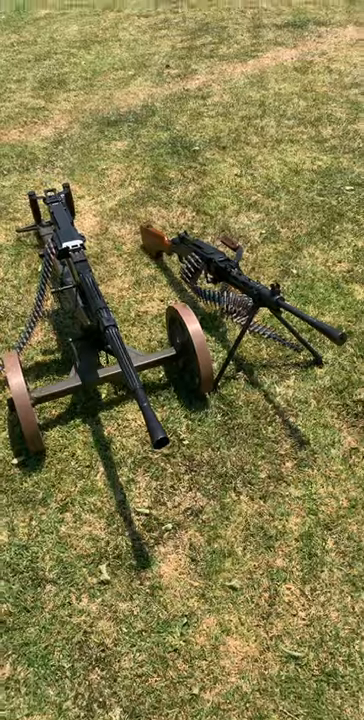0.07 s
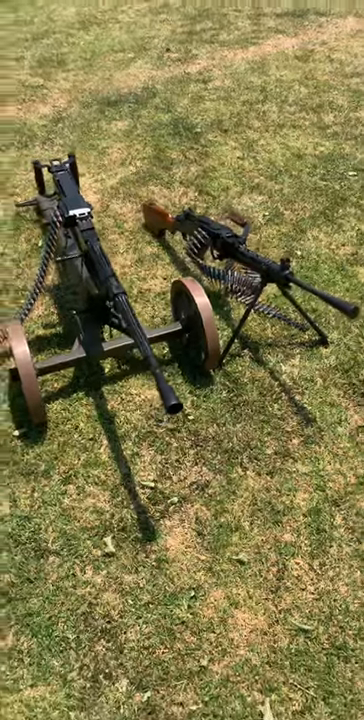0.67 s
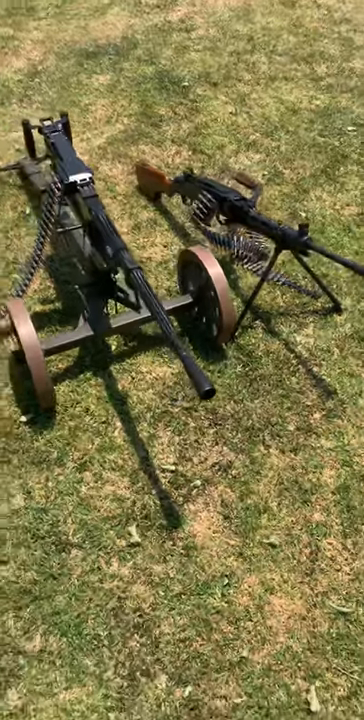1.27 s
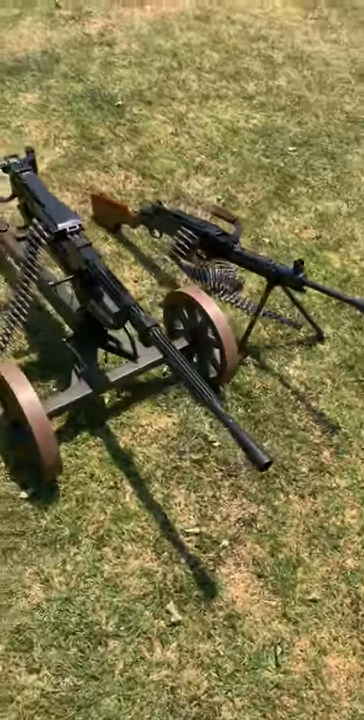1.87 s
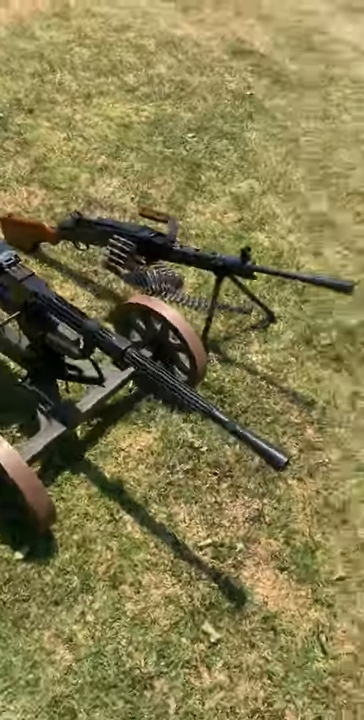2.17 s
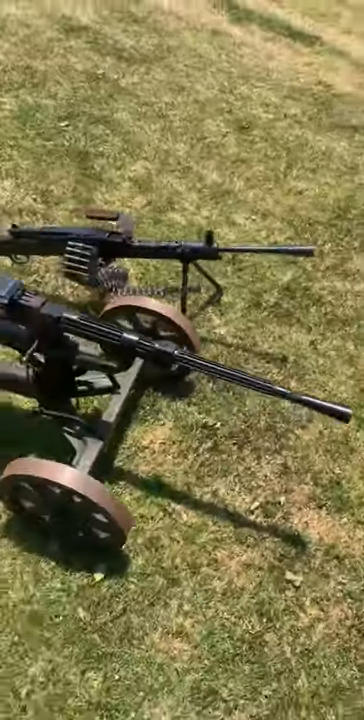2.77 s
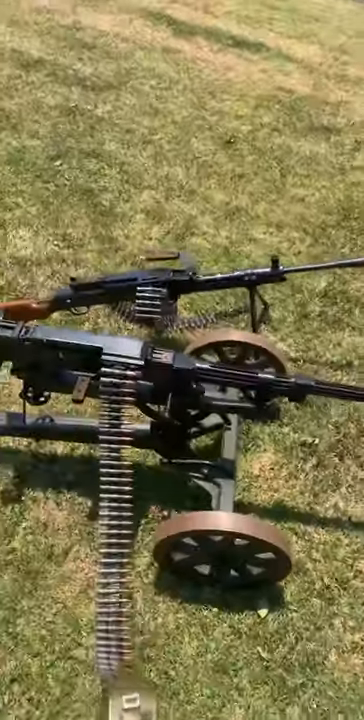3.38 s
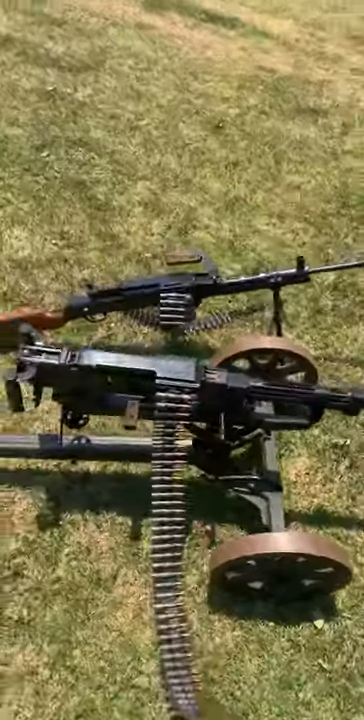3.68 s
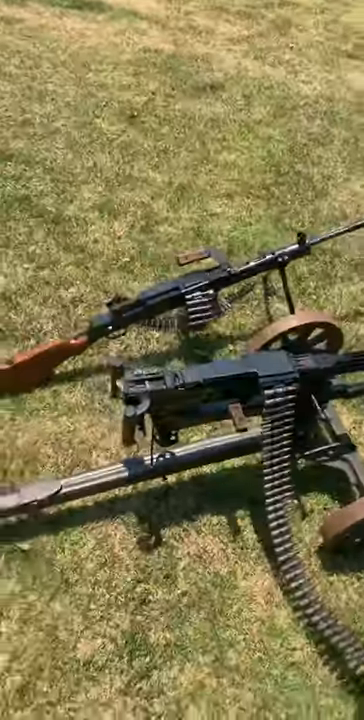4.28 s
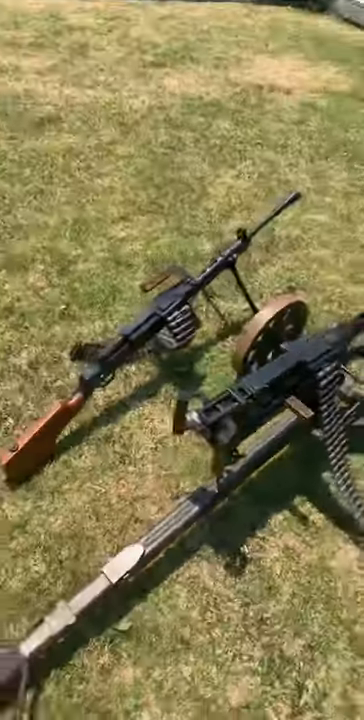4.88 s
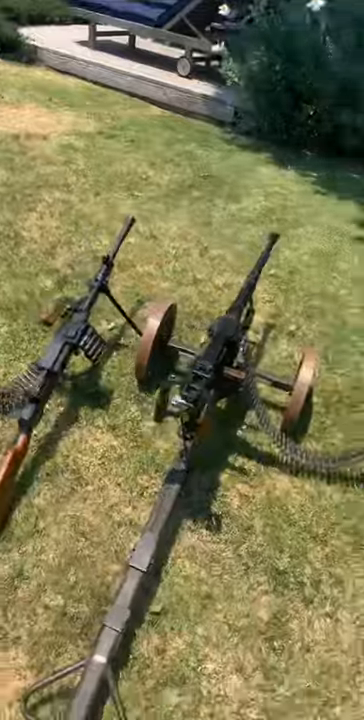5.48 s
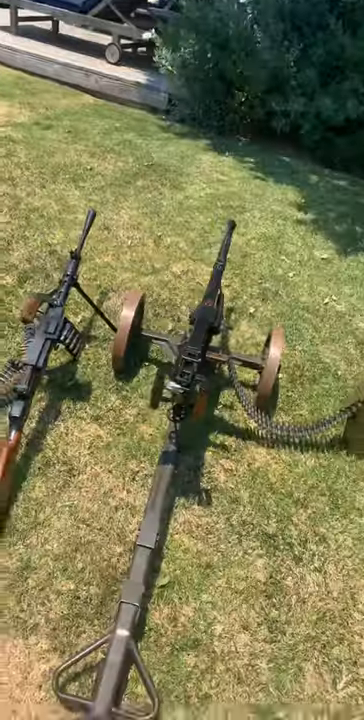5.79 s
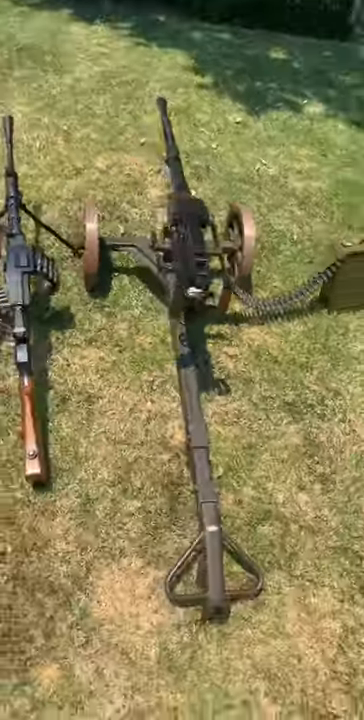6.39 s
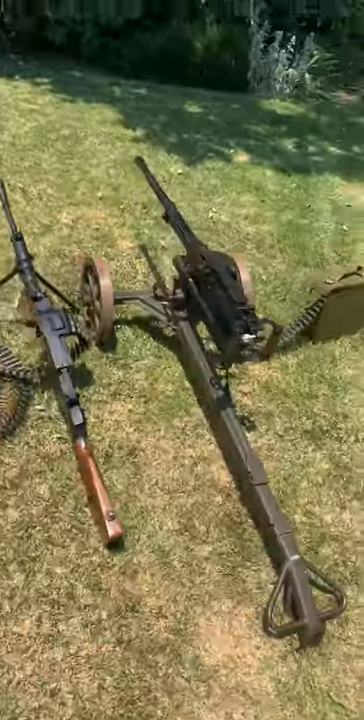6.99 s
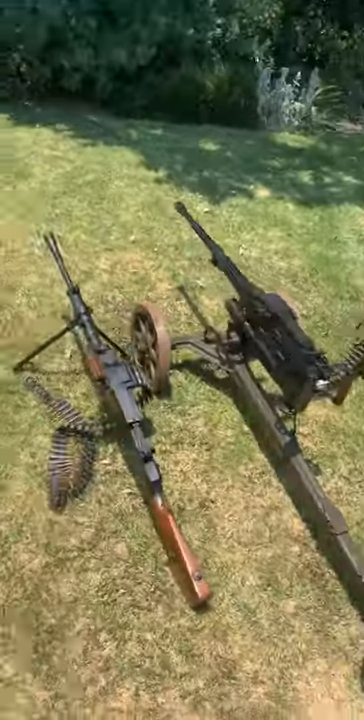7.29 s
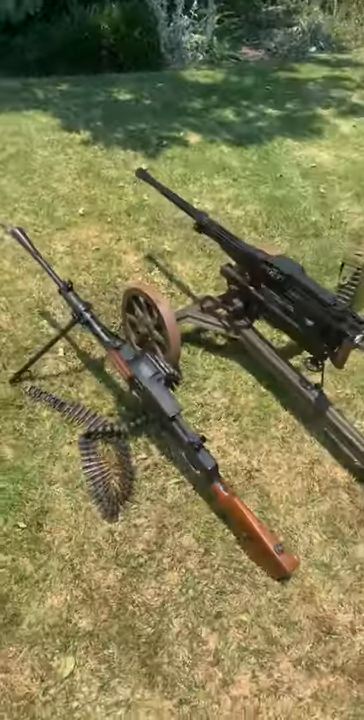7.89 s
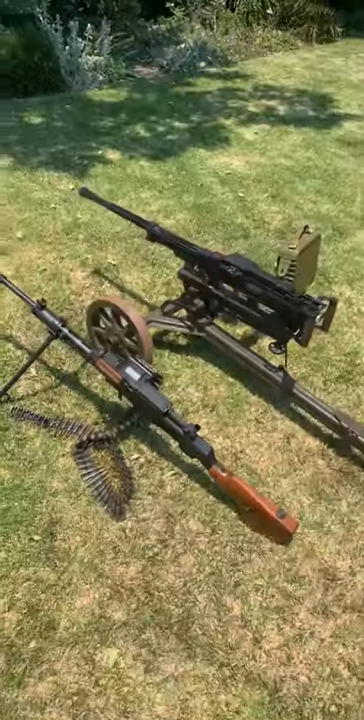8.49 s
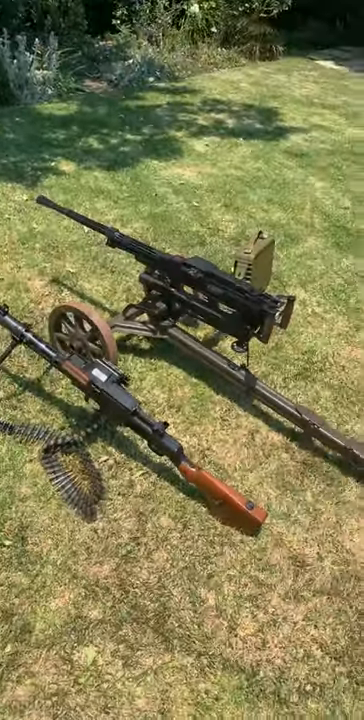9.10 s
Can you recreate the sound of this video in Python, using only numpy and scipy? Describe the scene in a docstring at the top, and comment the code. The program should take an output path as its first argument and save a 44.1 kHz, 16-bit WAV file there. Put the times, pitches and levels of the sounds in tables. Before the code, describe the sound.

Slow, soft footsteps rustle and crunch through dry grass, with small snaps, low wind rumble on the microphone and a distant drone.

```python
"""A dry lawn, outdoors, with no echo. Someone walks slowly across it, microphone in hand.
Shoes brush through the blades in a bright rustle of tiny clicks, press the dead thatch flat and crunch
on the packed turf. Bent blades tick back, stalks snap, and now and then a shoe creaks or scuffs.
Behind it lie a distant drone, a soft wash and the low rumble of moving air on the microphone."""
import sys
import numpy as np
from scipy import signal
from scipy.fft import rfft, irfft, next_fast_len
from scipy.io import wavfile

SR = 44100
rng = np.random.default_rng(int(sys.argv[2]) if len(sys.argv) > 2 else 0)


def inscribe(sig):
    """Save sig as 16-bit PCM at rate SR to the path in sys.argv[1].

    A 1-D sig is mono; a 2-D sig holds one channel per row.
    Samples are clipped to [-1, 1] before scaling.
    """
    pcm = np.round(np.clip(np.atleast_2d(sig).T, -1, 1) * 32767)
    wavfile.write(sys.argv[1], SR, pcm.astype(np.int16))


N = 402633
TIME = np.arange(N) / SR


def gain_of(db):
    """Decibels to amplitude."""
    return 10 ** (np.asarray(db) / 20)


def unit_rms(x):
    """Scales to rms 1."""
    return x / np.sqrt(np.mean(x ** 2) + 1e-20)


def fader(rows):
    """Gain at every sample from rows of (seconds, dB)."""
    return gain_of(np.interp(TIME, *np.transpose(rows)))


def add(mix, start_s, sound):
    """Mixes a sound in at a time."""
    part = mix[round(start_s * SR):][:len(sound)]
    part += sound[:len(part)]


def equalise(x, curve):
    """Shapes a signal with an EQ curve of (Hz, dB) points, then scales it to rms 1."""
    size = next_fast_len(len(x))
    hz, db = np.transpose(curve)
    shape_db = np.interp(np.log(np.fft.rfftfreq(size, 1 / SR) + 1), np.log(hz), db)
    return unit_rms(irfft(rfft(x, size) * gain_of(shape_db), size)[:len(x)])


def resonate(x, hz, q):
    """One broad resonance."""
    hz = min(hz, SR * .45)
    return signal.lfilter(*signal.iirpeak(hz, max(q, 3 * hz / SR), SR), x)


def resonate_twice(x, hz, q):
    """Two passes through a resonance, for steeper sides."""
    return resonate(resonate(x, hz, q), hz, q)


def wander(per_s):
    """A random curve of rms 1 that changes so many times a second."""
    knots = rng.standard_normal(N // 16)
    return unit_rms(np.interp(TIME * per_s, np.arange(len(knots)), knots))


def fractures(per_s, spread_db):
    """A train of tiny clicks: many small, a few large."""
    size = gain_of(spread_db * np.minimum(rng.exponential(1, N), 5))
    return unit_rms(size * rng.choice([-1, 1], N) * (rng.random(N) < per_s / SR))


def stalks(per_s, spread_db, clump_db, clumps_per_s, pitches_hz, q):
    """Stalks of several sizes, each ringing briefly at its own pitch and giving way in clumps."""
    out = np.zeros(N)
    for hz in pitches_hz:
        clicks = fractures(per_s, spread_db) * gain_of(clump_db * wander(clumps_per_s))
        out += resonate(clicks, hz, q)
    return unit_rms(out)


TOUCH_S, ROLL_DB_PER_S = .04, 120


def step_db(start_s, roll_s, hold_s, fall_db_per_s):
    """The load of one step: a quick touch, roll to full weight, hold, release."""
    t = TIME - start_s
    rise_db = np.interp(t, [-TOUCH_S, 0, roll_s], [-30, -ROLL_DB_PER_S * roll_s, 0], left=-100)
    return rise_db - fall_db_per_s * np.maximum(t - roll_s - hold_s, 0)


def swing_db(peak_s, gather_s, stop_db_per_s=199):
    """The swell of one swing: the foot gathers speed, then stops short."""
    t = TIME - peak_s
    return np.where(t < 0, -7 * (t / gather_s) ** 2, -stop_db_per_s * t)


# Grass stirring under the standing foot. Each row: time in seconds, relative level in dB.
FOOT_STIR = [(.9, -83), (1.17, -61), (1.7, -60.5), (2.4, -58), (3.55, -65.5), (4.6, -60.5), (6.3, -64),
             (7.3, -60), (7.62, -63.5), (8.05, -59.5), (8.55, -64.5), (9.1, -64)]
# A foot swings through the grass. Each row: fastest moment and time to gather speed in seconds,
# relative blade level and brightness in dB.
FOOT_SWINGS = [(1.525, 0.047, -51.5, 0), (2.12, 0.11, -51.5, 3), (2.215, 0.087, -48, 1),
               (2.84, 0.13, -56, 0), (2.93, .09, -53, 2), (3.4, 0.048, -57, -7), (4.03, 0.069, -54.5, 0),
               (4.76, 0.1, -50.5, -3), (4.96, .04, -56.5, -16), (5.09, 0.039, -50, -1),
               (5.37, 0.082, -51.5, -5), (5.485, 0.17, -51.5, 1), (5.7, 0.016, -53.5, -12),
               (6.0, 0.16, -51, 0), (6.16, 0.081, -53, -4), (6.71, 0.065, -51.5, 0), (6.78, 0.11, -52, 0),
               (6.9, .14, -55, -5), (7.29, 0.034, -53.5, -2), (7.39, .1, -60, -1)]
# A foot comes down. Each row: start, roll to full weight and hold in seconds, relative levels of
# blades, thatch and turf in dB, brightness in dB, centre of the turf's crunch in Hz.
FOOTFALLS = [(1.82, 0.075, 0.066, -51.5, -54, -55, -8, 554), (2.43, 0.012, 0.014, -51, -52, -71, -4, 583),
             (2.499, 0.039, 0.042, -43.5, -50, -51.5, -2, 575),
             (2.716, 0.021, 0.022, -50, -54.5, -52, -1, 626),
             (3.095, 0.024, .04, -50.5, -48.5, -57, -8, 540),
             (3.167, 0.031, 0.041, -46, -51.5, -47, -11, 438),
             (3.68, 0.054, 0.039, -48, -51.5, -60, -8, 600), (3.89, 0.015, .05, -52, -54, -55, -11, 640),
             (4.46, 0.099, 0.033, -51, -53, -52, -7, 540), (5.16, 0.053, 0.054, -46.5, -53.5, -54, 0, 650),
             (5.79, 0.028, 0.1, -51, -55, -50.5, -10, 595), (6.425, .02, 0.062, -46, -53.5, -55, -2, 603),
             (6.553, 0.023, .015, -50.5, -52.5, -51.5, -8, 603),
             (7.015, 0.022, .03, -52.5, -52, -59, -8, 580), (7.1, 0.045, 0.027, -44.5, -47, -48, -8, 576),
             (7.741, 0.078, 0.027, -42, -50.5, -52.5, -1, 630)]


def footsteps():
    """Stirring, steps and swings drive the blades and the thatch; only steps reach the turf."""
    stir_db = np.interp(TIME, *np.transpose(FOOT_STIR), left=-100)
    moves = [(stir_db, stir_db - 3.5, -6)]  # blades, thatch, brightness
    for start_s, roll_s, hold_s, blades_db, thatch_db, _, bright_db, _ in FOOTFALLS:
        brush_db = blades_db + step_db(start_s, roll_s, hold_s, fall_db_per_s=87)
        crush_db = thatch_db + step_db(start_s, roll_s, hold_s, fall_db_per_s=130)
        moves.append((brush_db, crush_db, bright_db))
    for peak_s, gather_s, blades_db, bright_db in FOOT_SWINGS:
        brush_db = blades_db + swing_db(peak_s, gather_s)
        moves.append((brush_db, brush_db - 7, bright_db))  # a swing barely presses the thatch
    brush_power, crush_power, weighted_bright = np.full((3, N), 1e-14)
    for brush_db, crush_db, bright_db in moves:
        heard = brush_db > -95
        power = gain_of(brush_db[heard]) ** 2
        brush_power[heard] += power
        weighted_bright[heard] += power * bright_db
        crush_power[heard] += gain_of(crush_db[heard]) ** 2
    patch_db = .8 * wander(per_s=30)  # the lawn is patchy
    rustle = blades(10 * np.log10(brush_power) + patch_db, weighted_bright / brush_power)
    crunch = thatch(10 * np.log10(crush_power) + patch_db)
    return rustle + crunch + turf()


def turf():
    """Under full weight the packed turf gives a low, soft crunch."""
    out = np.zeros(N)
    for start_s, roll_s, hold_s, _, _, turf_db, _, hz in FOOTFALLS:
        crunch = unit_rms(resonate_twice(rng.standard_normal(SR), hz, q=1.0))
        onset_s = start_s - TOUCH_S
        load_db = step_db(start_s, roll_s, hold_s, fall_db_per_s=137)[round(onset_s * SR):][:SR]
        add(out, onset_s, crunch * gain_of(turf_db + load_db))
    return out


# The crisp tone of dry blades. Each row: frequency in Hz, EQ gain in dB.
BLADE_EQ = [(1500, -27), (2600, -8), (4000, -5.5), (4700, -7.5), (5450, -6), (6600, -3), (7600, 1.5),
            (9300, 0.5), (12200, 2), (14000, -4.5), (15000, -8), (15700, -8)]


def blades(level_db, bright_db, hard_brush_db=-38.5):
    """Dry blades flick against the shoe; a hard brush also rasps the thicker stems."""
    ticks = fractures(per_s=12000, spread_db=2.5) * gain_of(0.73 * wander(per_s=61))
    rings = stalks(per_s=1500, spread_db=3.0, clump_db=3.5, clumps_per_s=41,
                   pitches_hz=np.geomspace(4000, 14000, num=7), q=4.8)
    rustle = equalise(ticks + .5 * rings, BLADE_EQ)
    # brightness tilts the top end while the loudness stays about even
    top = signal.sosfiltfilt(signal.butter(2, 9500, "high", fs=SR, output="sos"), rustle)
    lift = gain_of(bright_db + 3.5)
    rustle = (rustle - top + lift * top) / np.sqrt(0.51 + 0.41 * lift ** 2)
    stem_eq = [(4000, -46), (4900, -25), (5450, 4.0), (6300, 5), (7200, -1.5), (10000, -42)]
    stems = equalise(fractures(per_s=3000, spread_db=1.0), stem_eq)
    force_db = level_db - hard_brush_db
    return (rustle + gain_of(-6.5 + 0.68 * force_db) * stems) * gain_of(level_db)


# The midrange body of the thatch. Each row: frequency in Hz, EQ gain in dB.
THATCH_EQ = [(150, -25), (330, -13), (520, -6.5), (900, -3), (1400, -1.5), (1950, -1), (2500, -9),
             (3500, -11), (5000, -16.5), (9000, -46)]


def thatch(level_db):
    """The sole crushes the mat of dead grass: a duller, lumpier crunch."""
    crunch = stalks(per_s=500, spread_db=3.0, clump_db=2.5, clumps_per_s=42,
                    pitches_hz=np.geomspace(500, 3000, num=7), q=2.6)
    grit = fractures(per_s=2500, spread_db=1.0)
    yielding = gain_of(1.5 * wander(per_s=110))
    return equalise((grit + 0.31 * crunch) * yielding, THATCH_EQ) * gain_of(level_db + 1.9)


# Fine crackle of flattened grass. Each row: time in seconds, relative level in dB.
SPRING_BACK_FADER = [(.8, -79), (1.2, -66), (3.5, -72), (6, -63), (7.6, -71), (8.1, -52), (8.8, -62),
                     (9.1, -56)]


def spring_back():
    """Single blades tick as they spring back behind the foot."""
    ticks = stalks(per_s=90, spread_db=2.2, clump_db=1.5, clumps_per_s=12,
                   pitches_hz=np.geomspace(8200, 13000, num=4), q=2.5)
    tick_eq = [(2500, -25), (5500, -1), (8000, -10), (13000, 0), (15800, -8)]
    return gain_of(-7) * equalise(ticks, tick_eq) * fader(SPRING_BACK_FADER)


# Dry stalks snapping. Each row: start in seconds, peak in dB, centre in Hz, sharpness as Q.
STALK_SNAPS = [(.3362, -44, 9600, 1.6), (2.096, -27.5, 10500, 2.2), (2.356, -28, 7700, 1.5),
               (4.368, -35, 6740, 1.3), (4.988, -39, 10600, 0.97), (5.568, -39, 10500, 0.95),
               (6.0205, -34, 11400, 1.4), (6.2617, -37.5, 6660, 1.6), (6.5193, -29, 9800, 1.3),
               (7.2705, -36, 8400, 1.8), (7.696, -36, 5500, 0.7), (7.7024, -33, 5200, 0.55),
               (7.708, -31, 8800, 0.84), (8.432, -37, 12000, 1.6), (8.6852, -42, 11100, 1.3)]


def snaps():
    """A stalk breaks with a sharp crack and a short splintering tail."""
    out, t = np.zeros(N), np.arange(2048) / SR
    for start_s, peak_db, hz, q in STALK_SNAPS:
        decay = np.exp(-t / .0005) + .25 * np.exp(-t / .002)
        crack = resonate_twice(rng.standard_normal(len(t)) * decay, hz, q)
        add(out, start_s, gain_of(peak_db) * crack / abs(crack).max())
    return out


# The shoe's resonances. Each row: multiple of the pitch, sharpness as Q, relative level in dB.
SHOE_MODES = [(0.97, 2.8, 14), (2.25, 3.5, -6)]
# The slips that make up a creak. Each row: start in seconds, peak in dB, pitch in Hz.
SHOE_SLIPS = [(1.517, -43, 1950), (1.533, -43, 1830), (1.54, -38, 1920), (2.3823, -33.5, 1840),
              (2.385, -33, 1950), (2.43, -39, 1860), (4.378, -40, 1550), (7.68, -32, 1590),
              (7.703, -35, 1900)]


def creaks():
    """Each slip of the bending shoe briefly knocks its damped resonances."""
    out, t = np.zeros(N), np.arange(2048) / SR
    for start_s, peak_db, hz in SHOE_SLIPS:
        slip = rng.standard_normal(len(t)) * np.exp(-t / .0011)
        ring = sum(gain_of(mode_db) * unit_rms(resonate_twice(slip, hz * ratio, q))
                   for ratio, q, mode_db in SHOE_MODES)
        add(out, start_s, gain_of(peak_db) * ring / abs(ring).max())
    return out


# Sharp scuffs. Each row: start and length in seconds, level in dB, centre in Hz.
SHOE_SCUFFS = [(1.518, 0.039, -56, 2000), (2.359, 0.012, -44, 7500), (2.365, .022, -44.5, 12000),
               (2.376, 0.029, -46, 7840), (2.379, 0.007, -46, 4030), (2.427, .04, -53, 1700),
               (3.225, 0.05, -47.5, 6650), (7.842, 0.032, -46.5, 1300)]


def scuffs():
    """A shoe rubs in a short burst of friction with one hissing resonance."""
    out = np.zeros(N)
    for start_s, length_s, level_db, hz in SHOE_SCUFFS:
        hiss = resonate(rng.standard_normal(4096), hz, q=5.6)
        rub = unit_rms(resonate(hiss, hz, q=0.33))[:int(length_s * SR)]
        add(out, start_s, gain_of(level_db) * rub * signal.windows.tukey(len(rub), .5))
    return out


# Puffs of air. Each row: midpoint in seconds, half the full length in seconds, level in dB.
WIND_PUFFS = [(1.185, 0.089, -38), (1.657, 0.16, -37.5), (2.947, 0.59, -43), (3.625, 0.19, -36),
              (4.68, .15, -47), (5.684, 0.068, -37.5), (5.935, .11, -30.5), (6.163, .11, -30.5),
              (6.554, 0.29, -33.5), (6.745, 0.081, -30.5), (6.99, 0.17, -36), (7.346, 0.21, -39.5)]
# The deep tone of the buffeting. Each row: frequency in Hz, EQ gain in dB.
WIND_EQ = [(12, -13), (25, -15), (42, 1), (62, -1), (82, -2), (110, -11), (160, -16.5), (300, -42.5),
           (700, -71)]


def wind(breeze_db=-40.5, sway_db=0.66):
    """Air rumbles on the microphone: a swaying breeze and bell-shaped puffs."""
    rumble = equalise(rng.standard_normal(N), WIND_EQ)
    power = gain_of(breeze_db + sway_db * wander(per_s=8)) ** 2
    for middle_s, half_s, level_db in WIND_PUFFS:
        puff = gain_of(level_db) * np.hanning(int(2 * half_s * SR))
        add(power, middle_s - half_s, puff ** 2)
    return rumble * np.sqrt(power)


# The tones of the drone's low hum and midrange roar. Each row: frequency in Hz, EQ gain in dB.
HUM_EQ = [(70, 0), (125, -3.5), (180, 1), (245, -1), (300, -6.5), (390, -20), (700, -61)]
ROAR_EQ = [(200, 0), (380, 0.5), (470, 2), (620, -6.5), (820, -3.5), (1200, -6), (2000, -46), (4000, -45)]
# How each swells and fades. Each row: time in seconds, level in dB.
HUM_FADER = [(.18, -43.5), (1.1, -44), (1.5, -47.5), (1.9, -52.5), (2.7, -50.5), (3.3, -45), (4.5, -44),
             (6.3, -54), (7.5, -46.5), (9.1, -53.5)]
ROAR_FADER = [(.18, -74), (.9, -61), (1.6, -66), (2, -54), (2.7, -63), (5, -56), (6, -59.5), (8.7, -54.5),
              (9.1, -55)]


def distant_drone():
    """Two bands of noise, a hum and a roar, slowly rise and fall far away."""
    hum = equalise(rng.standard_normal(N), HUM_EQ) * fader(HUM_FADER)
    roar = equalise(rng.standard_normal(N), ROAR_EQ) * fader(ROAR_FADER)
    return hum + roar


# The soft tone of the open air. Each row: frequency in Hz, EQ gain in dB.
AIR_EQ = [(150, 7.5), (450, 0.5), (680, -2.5), (1000, -4.5), (1300, -2.5), (2000, -7.5), (2900, -9.5),
          (3700, -13), (6500, -20.5), (12300, -26.5), (15500, -50)]
# Its slow drift. Each row: time in seconds, level in dB.
AIR_FADER = [(.2, -51.5), (1.2, -53.5), (3.5, -54), (6.2, -55), (7.6, -52), (8.3, -52), (9.1, -51.5)]


def open_air():
    """A broad bed of noise whose level flickers slightly."""
    wash = equalise(rng.standard_normal(N), AIR_EQ) * fader(AIR_FADER)
    return wash * gain_of(0.69 * wander(per_s=16))


def scene():
    """Grass and shoes over the background, in one channel."""
    walker = footsteps() + spring_back() + snaps() + creaks() + scuffs()
    return (walker + wind() + distant_drone() + open_air())[None]


def record(dry):
    """The sound opens after a moment of silence, with the highest treble cut off."""
    silence_s, fade_s, cutoff_hz = 0.172, .002, 15750
    opened = dry * np.clip((TIME - silence_s) / fade_s, 0, 1)
    lowpass = signal.firwin(511, cutoff_hz, window=("kaiser", 9), fs=SR)
    return signal.oaconvolve(opened, lowpass[None], "same")


dry = scene()
out = record(dry)
inscribe(out)
```